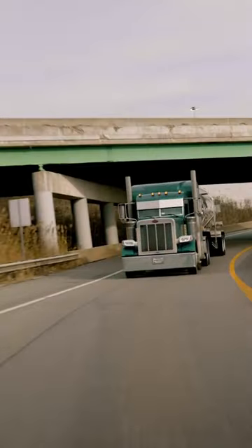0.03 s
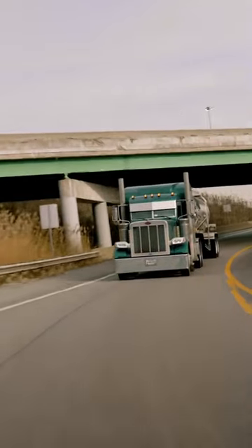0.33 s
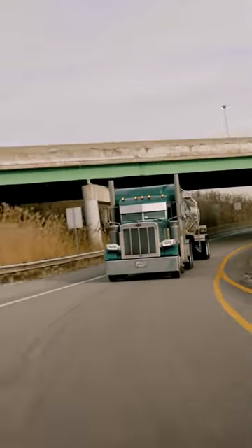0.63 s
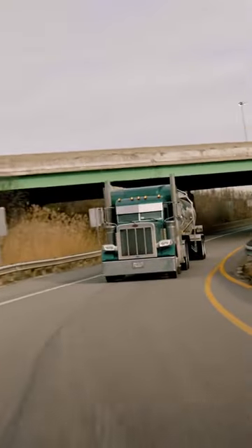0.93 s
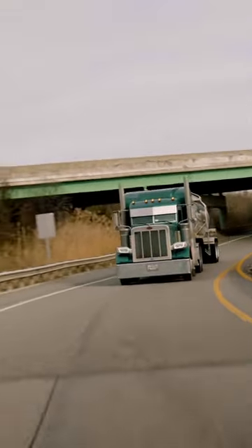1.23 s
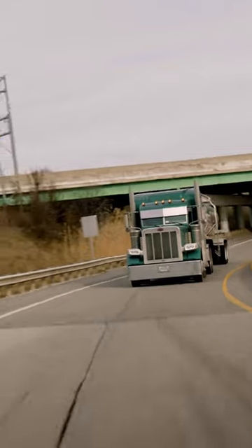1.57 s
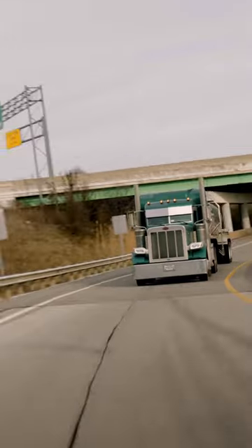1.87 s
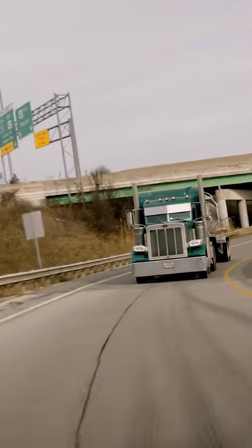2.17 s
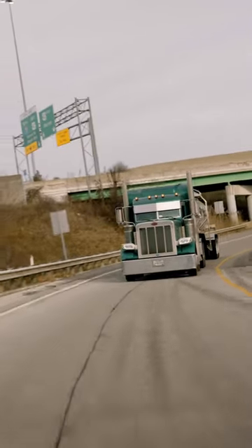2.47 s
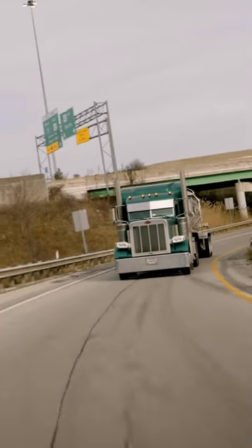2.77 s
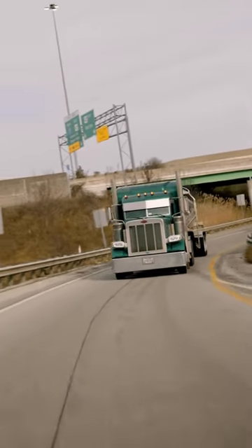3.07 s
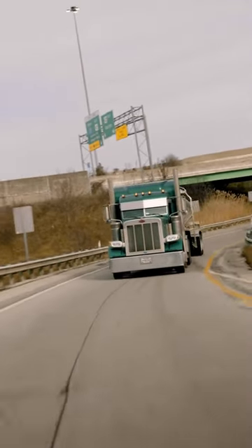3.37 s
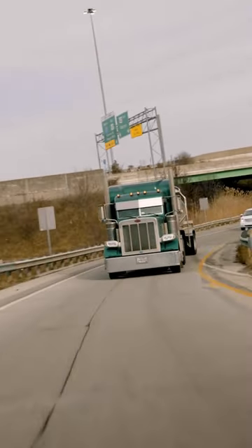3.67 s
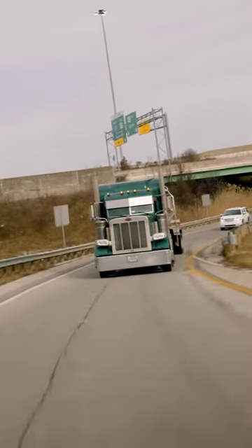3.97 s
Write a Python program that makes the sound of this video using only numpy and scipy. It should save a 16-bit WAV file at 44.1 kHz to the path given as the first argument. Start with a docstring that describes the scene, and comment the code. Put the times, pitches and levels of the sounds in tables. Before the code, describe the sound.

A heavy diesel truck's engine brake chatters hard, then gives way to a smoother roar.

```python
"""The hard chatter of an engine brake: a heavy six-cylinder diesel truck follows the microphone down a
highway ramp, from under a bridge into the open. Two cylinders vent much harder than the rest, cracking
through the stacks once a cycle. Near 3 s the brake lets go, the turbo whistle runs down, and a smoother
roar builds over tyre noise and wind."""
import sys
import numpy as np
from scipy import signal
from scipy.io import wavfile
from scipy.ndimage import uniform_filter1d

SR = 44100
rng = np.random.default_rng(int(sys.argv[2]) if len(sys.argv) > 2 else 0)


def pcm_store(signal):
    """Save signal as 16-bit PCM."""
    levels = np.round(np.clip(np.atleast_2d(signal), -1, 1) * 32767)
    wavfile.write(sys.argv[1], SR, levels.astype(np.int16).T)


N = 176400
T = np.arange(N) / SR

# engine speed: t/s, firing rate/Hz
FIRING_RATE = [(0, 80.95), (.75, 80.03), (1.5, 79.43), (2.25, 78.77), (3, 78.09), (3.4, 78), (4, 78.6)]
# the six cylinders: place in the cycle/firing intervals, thump/dB, rasp/dB, crack/dB
CYLINDERS = [(.72, -5.1, -4, -19), (1.76, -1.25, -1, -9), (2.8, -2.2, 0, -6), (3.82, -3.3, -3, -18),
             (4.85, -10.6, -6, -25), (5.72, -11.7, -10, -27)]
# how hard the engine brake bites: t/s, thump/dB, rasp/dB, crack/dB
BRAKE = [(0, -0.3, -1, -6), (.35, 0, -2.5, -7), (.7, 0.8, 0, 1), (.95, -0.9, -1.5, 2.5),
         (1.3, 0.5, -1.5, 1), (1.7, -0.5, 0.5, 3), (2.7, -1.14, 1, 4.5), (2.895, 1.5, 1.5, 0),
         (2.925, -5.5, -0.5, -12), (2.965, -7, -3, -29), (3.02, -22, -25, -43), (3.2, -65, -52, -54)]


def amp(db):
    """Decibels to gain."""
    return 10 ** (np.asarray(db) / 20)


def unit(x):
    """Scales to rms 1."""
    return x / np.sqrt(np.mean(x ** 2) + 1e-20)


def curves(table, t=T):
    """Every column of a time table, read at times t."""
    s, *columns = np.transpose(table)
    return [np.interp(t, s, c) for c in columns]


def at_hz(table, hz):
    """A spectrum table, read on a log-frequency axis."""
    f, value = np.transpose(table)
    return np.interp(np.log(hz + 1), np.log(f), value)


def noise(tone, patch_db=2):
    """Coloured stereo noise at rms 1, with small drifting patches in its spectrum."""
    # likeness of left and right at the microphone: f/Hz, correlation
    likeness = [(20, .5), (70, 0.83), (200, 0.8), (500, 0.74), (2000, 0.87), (4000, 0.7), (9000, 0.16),
                (16000, 0.58)]
    hz = np.fft.rfftfreq(2048, 1 / SR)
    a, b, c, d, patches = rng.standard_normal((5, N // 512 + 6, len(hz))).transpose(0, 2, 1)
    patches = unit(uniform_filter1d(uniform_filter1d(patches, size=12, axis=0), size=6, axis=1))
    same, left = at_hz(likeness, hz)[:, None], a + 1j * b
    spectra = np.array([left, same * left + np.sqrt(1 - same ** 2) * (c + 1j * d)])
    spectra *= amp(at_hz(tone, hz)[:, None] + patch_db * patches)
    return unit(signal.istft(spectra, nperseg=2048, noverlap=1536)[1][:, :N])


def clicks(times, gains):
    """Single-sample impulses."""
    out, inside = np.zeros(N), (times > 0) & (times < T[-1])
    np.add.at(out, (times[inside] * SR).astype(int), gains[inside])
    return out


def scattered(train, tone, echo_db, decay_s=.005, width=.22):
    """Coloured impulses, each trailing a short spray of reflections off cab and road."""
    dying = np.exp(-2 * T[:4096] / decay_s)
    spray = np.sqrt(abs(signal.fftconvolve(train ** 2, dying / dying.sum())[:N]))
    echoes = amp(echo_db) * spray * unit(rng.standard_normal(N) + width * rng.standard_normal((2, N)))
    log_gain = np.log(amp(at_hz(tone, abs(np.fft.fftfreq(4096, 1 / SR)))))
    impulse = np.fft.ifft(np.exp(np.conj(signal.hilbert(log_gain)))).real[:2048]  # minimum phase
    return signal.fftconvolve(train + echoes, impulse[None], axes=1)[:, :N]


def tyres_and_wind():
    """The steady rush around the moving microphone."""
    # colour of the rush: f/Hz, relative level/dB
    rush_tone = [(20, -16), (45, -5), (70, -10), (150, 11), (280, 6.5), (420, 0), (800, -5.5), (1400, -7.5),
                 (2200, -35.5), (3300, -31.5), (5000, -52.5), (8000, -40.5), (12000, -52.5), (16000, -73.5)]
    return amp(-33) * noise(rush_tone)


def turbo(width_hz=120):
    """A thin, fuzzy whistle that runs down when the brake lets go."""
    # the whistle: t/s, f/Hz, level/dB
    whistle = [(0, 8170, -71), (1, 8110, -72), (2, 8050, -69), (2.87, 7980, -69), (2.945, 7650, -67.5),
               (2.99, 7350, -74), (3.07, 7060, -74), (3.12, 6800, -64), (3.16, 6670, -63.5),
               (3.19, 6550, -71), (3.25, 6300, -69), (3.36, 6020, -67.5), (3.6, 5700, -82)]
    hz, level_db = curves(whistle)
    pole = np.exp(-np.pi * width_hz / SR)
    white = rng.standard_normal((2, N)) + 1j * rng.standard_normal((2, N))
    fuzz = signal.lfilter([1], np.poly([pole, pole]), white)
    carrier = np.exp(2j * np.pi * np.cumsum(hz) / SR)
    return amp(level_db) * unit(((fuzz + fuzz.mean(0)) * carrier).real)


def roar(cycle, pulse_depth=.11):
    """Off the brake: a soft exhaust hum, a low rumble and a wide roar that pulses with the firings."""
    # exhaust hum: multiple of the cycle rate, relative level/dB
    orders = [(6, -39.5), (10, -38), (11, -45.5), (13, -52.5), (16, -41.5), (18, -55), (20, -39.5),
              (23, -43), (42, -45.5), (50, -55.5), (58, -50.5), (66, -49)]
    # swell of the hum: t/s, gain/dB
    hum_gain = [(2.85, -38), (3, -6.5), (3.25, 2), (3.5, 1.5), (3.94, 1), (4, -17)]
    # swell of the noise: t/s, rumble/dB, roar/dB
    swell = [(2.8, -58, -74), (3, -66, -43), (3.12, -46, -35.5), (3.21, -43, -34), (3.28, -42, -36.5),
             (3.32, -34, -29), (3.39, -28.5, -29.5), (3.48, -27, -27), (3.58, -26.5, -27),
             (3.69, -27.5, -29.5), (3.8, -27.5, -28.5), (3.925, -26, -28.5), (3.955, -28, -29),
             (3.985, -45, -42)]
    # colours of rumble and roar: f/Hz, relative level/dB
    rumble_tone = [(20, -35.5), (45, -28), (65, -11.5), (130, -3), (180, -8), (220, -3), (275, 0),
                   (350, -17.5), (600, -23), (2000, -63)]
    roar_tone = [(20, -36.5), (200, 4), (380, -0.5), (560, 3), (850, 3), (1200, -4.5), (1550, -2),
                 (2200, -11), (3200, -19.5), (5000, -28.5), (8000, -37.5), (12000, -46), (16000, -62)]
    rumble_db, roar_db = curves(swell)
    hum = sum(amp(db) * np.cos(2 * np.pi * (k * cycle + rng.random())) for k, db in orders)
    hum *= np.sqrt(2) * amp(curves(hum_gain)[0])
    pulsing = 1 + pulse_depth * np.cos(2 * np.pi * len(CYLINDERS) * cycle)
    return hum + amp(rumble_db) * noise(rumble_tone) + amp(roar_db) * unit(pulsing * noise(roar_tone))


def lull(cycle, place=.05, width=.7):
    """Exhaust gain that sags once a cycle, after the weak cylinders; place, width in firing intervals."""
    # the sag: t/s, depth/dB
    depth = [(0, 0.5), (1.1, 2.5), (1.5, 6.5), (2.7, 6), (2.9, 3)]
    count = len(CYLINDERS)
    away = (cycle * count - place + count / 2) % count - count / 2
    dip = np.exp(-.5 * (away / width) ** 2)
    return amp(curves(depth)[0] * (dip.mean() - dip))


def thump(cycle, pipe_hz=180, pipe_width_hz=32, bright_from_hz=260, pan_db=1.25, skew_s=.0003):
    """Uneven cylinders pulse the exhaust pipe: a stack of orders that throbs once a cycle."""
    # braking tone: multiple of the cycle rate, level at the bridge/dB, level in the open/dB
    orders = [(6, -31, -32), (7, -47, -47), (8, -45, -43), (9, -36, -36), (10, -30, -31), (11, -37, -38),
              (12, -30, -30), (13, -30, -28), (14, -46, -44), (15, -37, -35), (16, -33, -31),
              (17, -30, -28), (18, -37, -27), (19, -27, -39), (20, -50, -48), (21, -34, -41),
              (22, -35, -34), (23, -37, -46), (24, -38, -37), (25, -37, -49), (26, -43, -40),
              (27, -42, -44), (28, -45, -46), (29, -43, -51), (30, -46, -39), (31, -47, -42),
              (32, -47, -50), (33, -55, -41), (34, -48, -55), (35, -55, -48), (36, -47, -48),
              (37, -49, -44), (38, -42, -45), (39, -42, -41), (40, -44, -48), (41, -52, -51),
              (42, -49, -57), (43, -52, -54), (44, -48, -56), (45, -44, -44), (46, -57, -49),
              (50, -50, -49), (51, -49, -47), (55, -58, -50), (56, -54, -52), (57, -56, -44),
              (63, -59, -49), (64, -56, -60), (66, -54, -60), (68, -55, -60), (69, -57, -55)]
    # strongest reflection, at the bridge and then in the open: delay/s, gain
    reflections = [(.0159, -.48), (.0083, .6)]
    # brightening as the brake bites: t/s, tilt/(dB per octave)
    brightening = [(0, 0), (1.1, 0), (1.4, 1), (1.85, 1.6), (2.35, 0.4), (2.65, 1.1), (2.87, 2.4)]
    place, strength_db = np.transpose(CYLINDERS)[:2]
    in_open = np.interp(T, [.91, 2], [0, 1])
    out, tilt_db = np.zeros(N), curves(brightening)[0]
    for k, bridge_db, open_db in orders:
        hz = k * FIRING_RATE[0][1] / len(CYLINDERS)
        # pipe, cylinders and reflection set each order's phase
        pipe = 1 / (1 + 1j * (hz - pipe_hz ** 2 / hz) / pipe_width_hz)
        pulses = pipe * np.sum(amp(strength_db) * np.exp(-2j * np.pi * k * place / len(CYLINDERS)))
        bridge, road = [np.angle(1 + gain * np.exp(-2j * np.pi * hz * s)) for s, gain in reflections]
        phase = 2 * np.pi * k * cycle + np.angle(pulses) + bridge + (road - bridge) * in_open
        octaves = max(np.log2(hz / bright_from_hz), 0)
        out += amp(bridge_db + (open_db - bridge_db) * in_open + tilt_db * octaves) * np.cos(phase)
    out *= np.sqrt(2) * amp(curves(BRAKE)[0])
    return lull(cycle) * np.array([amp(-pan_db) * out, amp(pan_db) * np.interp(T - skew_s, T, out)])


def rasp(cycle, vent_s, attack_s=.0012, decay_s=.0095, scatter_db=2):
    """Gas rushes out in a short puff at each venting, with a weaker flow in between."""
    # colour of the gas: f/Hz, relative level/dB
    gas_tone = [(20, -52), (100, -18), (250, 4.5), (500, 3), (800, 0), (1050, -6), (1400, -4.5),
                (1900, -10), (2400, -13), (3500, -24.5), (7000, -36.5), (16000, -57)]
    puff_db = np.transpose(CYLINDERS)[2] + curves(BRAKE, vent_s)[1]
    puff_db += rng.normal(0, scatter_db, vent_s.shape)
    t = T[:4096]
    puff = (1 - np.exp(-t / attack_s)) ** 2 * np.exp(-t / decay_s)
    puffs = signal.fftconvolve(clicks(vent_s - attack_s, amp(puff_db)), puff)[:N]
    flow = .3 * lull(cycle) * amp(curves(BRAKE)[1])
    return amp(-34.2) * unit(puffs + flow) * noise(gas_tone)


def stacks(blows):
    """The exhaust stacks ring at every blow."""
    # stack modes: f/Hz, gain/dB, t60/s
    modes = [(1350, -41, .03), (1510, -41, .04)]
    t = T[:4096]
    ring = sum(amp(db - 60 * t / t60) * np.sin(2 * np.pi * hz * t) for hz, db, t60 in modes)
    return signal.fftconvolve(blows, ring)[:N]


def cracks(vent_s, scatter_db=2, soft_hz=3980, slap_s=.029, slap_hz=900):
    """Each cylinder vents with a crack: a midrange bark, a treble snap and a dull slap of echo."""
    # the hardest cracks: t/s, relative bark/dB, relative snap/dB
    hardest = [(0.0348, -36.0, -48.5), (0.1834, -42, -52), (0.257, -44.0, -53), (0.3313, -42, -53),
               (0.406, -36.5, -49.5), (0.4689, -33, -59), (0.4817, -27.5, -52), (0.556, -32.5, -50.5),
               (0.6312, -32.0, -53), (0.6922, -31.0, -53), (0.7057, -30, -44), (0.7809, -35.0, -45.5),
               (0.858, -35, -55.0), (0.9298, -39, -52.0), (0.9924, -35, -56.5), (1.0054, -29.5, -50),
               (1.0806, -33, -50), (1.1556, -33, -47.5), (1.306, -35.5, -46), (1.4441, -31, -51),
               (1.4574, -31, -43.5), (1.5196, -28.5, -55), (1.5335, -25, -48), (1.5952, -24, -48.5),
               (1.6081, -24, -45.5), (1.6709, -29, -50), (1.6838, -24, -42.5), (1.745, -33, -44),
               (1.7589, -34, -47), (1.8225, -27.5, -46.0), (1.8358, -29, -41), (1.8983, -33, -54),
               (1.9104, -36, -42), (1.9894, -34.5, -50.5), (2.05, -32, -45), (2.126, -32, -47.0),
               (2.1389, -30, -41), (2.2022, -30.5, -48.5), (2.2801, -30, -49), (2.3542, -34, -54.0),
               (2.4303, -25, -44), (2.507, -30.5, -44.5), (2.5837, -25.5, -40.0), (2.6598, -28, -47),
               (2.6741, -32, -44), (2.7372, -35, -43.5), (2.8134, -28.5, -42), (2.8903, -34, -41.5),
               (2.9023, -33, -49.0)]
    # colours of bark and snap: f/Hz, gain/dB
    bark_tone = [(20, -42), (150, -20.5), (400, -1.5), (800, 0), (1050, -0.5), (1500, -2.5), (2400, -13),
                 (3300, -24), (5000, -45), (16000, -79.5)]
    snap_tone = [(20, -68.5), (1500, -43), (3000, -25.5), (4000, -21), (7500, -27), (12000, -44.5),
                 (16000, -48)]
    hard_s, bark_db, snap_db = np.transpose(hardest)
    soft_db = np.transpose(CYLINDERS)[3] + curves(BRAKE, vent_s)[2]
    soft_db += rng.normal(0, scatter_db, vent_s.shape)
    is_soft = abs(vent_s[..., None] - hard_s).min(-1) > .005  # no hard crack within 5 ms
    soft = signal.lfilter(*signal.butter(1, soft_hz, fs=SR), clicks(vent_s, is_soft * amp(soft_db)))
    blows = soft + clicks(hard_s, amp(bark_db + 32.5))
    barks = scattered(blows, bark_tone, echo_db=-5.5)
    snaps = scattered(soft + clicks(hard_s, amp(snap_db + 48)), snap_tone, echo_db=-2)
    delayed = np.interp(T - slap_s, T, barks.mean(0), left=0)
    slap = amp(-5.5) * signal.lfilter(*signal.butter(2, slap_hz, fs=SR), delayed)
    return barks + snaps + slap + stacks(blows)


def engine_brake(cycle, jitter_s=.00008):
    """The cylinders vent in turn into the exhaust, each with a thump, a crack and a rasp."""
    vent_cycles = np.arange(int(cycle[-1]))[:, None] + np.transpose(CYLINDERS)[0] / len(CYLINDERS)
    vent_s = np.interp(vent_cycles, cycle, T) + rng.normal(0, jitter_s, vent_cycles.shape)
    return thump(cycle) + cracks(vent_s) + rasp(cycle, vent_s)


def scene():
    """The truck heard from ahead, timed by one crankshaft, over the road noise."""
    cycle = np.cumsum(curves(FIRING_RATE)[0]) / SR / len(CYLINDERS)  # engine cycles elapsed
    return engine_brake(cycle) + roar(cycle) + turbo() + tyres_and_wind()


def record(dry, edge_hz=15700):
    """The recorder's band limit."""
    lowpass = signal.firwin(511, edge_hz, window=("kaiser", 9), fs=SR)
    return signal.oaconvolve(dry, lowpass[None], "same")


dry = scene()
out = record(dry)
pcm_store(out)
```